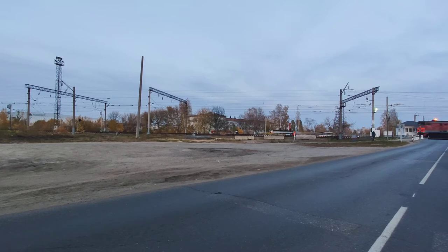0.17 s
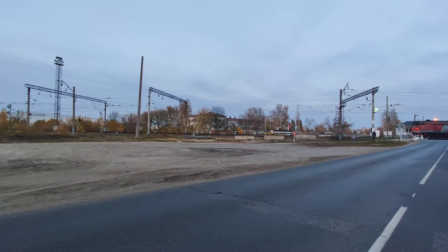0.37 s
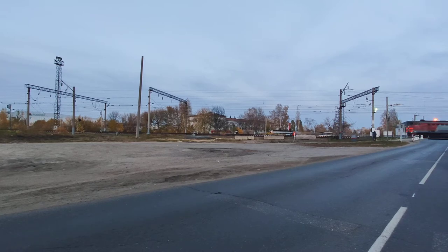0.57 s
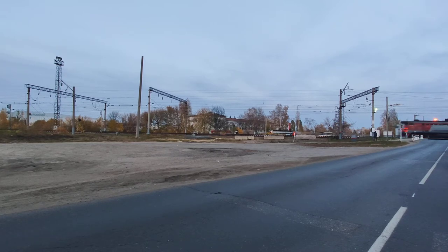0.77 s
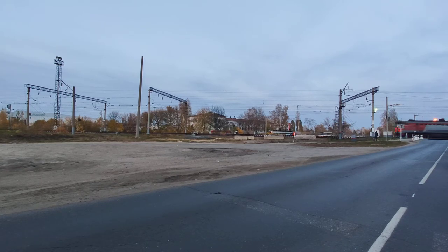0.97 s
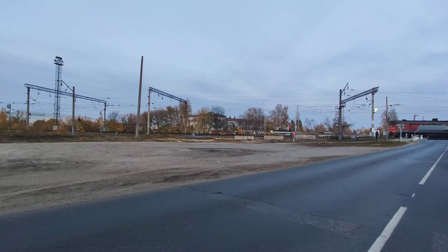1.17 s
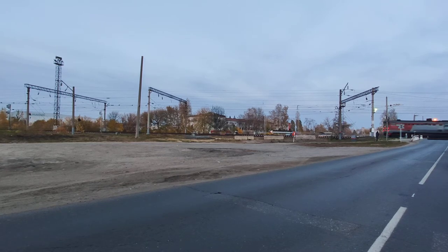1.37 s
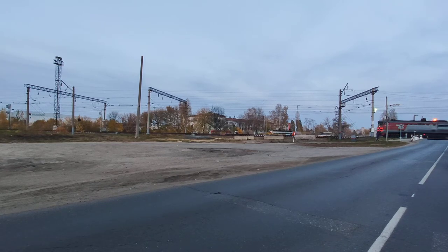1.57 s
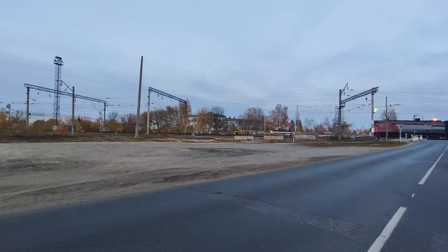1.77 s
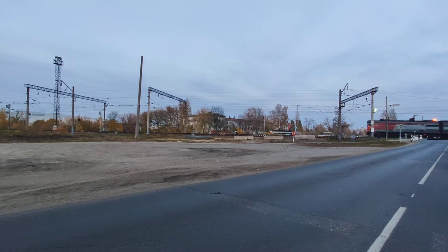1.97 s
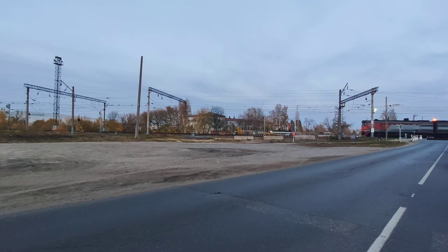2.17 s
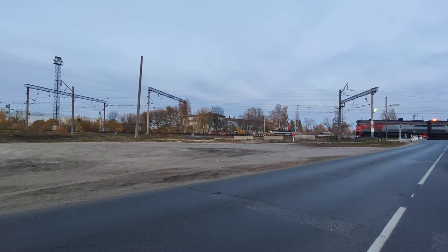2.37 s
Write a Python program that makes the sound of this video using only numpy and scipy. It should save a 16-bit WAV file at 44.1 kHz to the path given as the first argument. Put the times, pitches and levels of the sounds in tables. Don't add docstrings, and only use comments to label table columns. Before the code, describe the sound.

A distant diesel locomotive chugs unevenly at low revs with faint blower whine, while wheels rumble; a sharp clank and tick come early, then thuds and clanks thicken. Open roadside, stereo handheld microphone.

```python
import sys
import numpy as np
from scipy import signal
from scipy.fft import rfft, irfft
from scipy.io import wavfile

SR = 44100
rng = np.random.default_rng(int(sys.argv[2]) if len(sys.argv) > 2 else 0)


def magnitude_from_level(level_db):
    exponent = np.asarray(level_db, float) / 20
    return 10 ** exponent


def dump_mix(stems):
    frames = np.atleast_2d(stems).T
    limited = np.clip(frames, -1, 1)
    pcm = np.round(limited * 32767).astype(np.int16)
    wavfile.write(sys.argv[1], SR, pcm)


N = 111132
T = np.arange(N) / SR


def rms_one(x):
    return x / np.sqrt(np.mean(x ** 2) + 1e-20)


def at_hz(points, hz):
    table_hz, value = np.array(points).T[:2]
    return np.interp(np.log(hz), np.log(table_hz), value)


def drift(rate_hz):
    r = np.exp(-80 * np.pi * rate_hz / SR)
    slow = signal.lfilter([1], [1, -2 * r, r * r], rng.standard_normal(N // 40 + 2002))[2000:]
    return np.interp(np.arange(N) / 40, np.arange(len(slow)), rms_one(slow - slow.mean()))


def narrow(hz, width_hz, size=N):
    r = np.exp(-np.pi * width_hz / SR)
    poles = [1, -2 * r * np.cos(2 * np.pi * hz / SR), r * r]
    x = rng.standard_normal(size + 6000)
    for _ in range(2):
        x = signal.lfilter([1, 0, -1], poles, x)
    return rms_one(x[6000:])


def stereo_noise(colour_db, patchy_db, size=N):
    # f/Hz, likeness [0-1]
    likeness = [(40, .995), (300, .95), (600, .62), (900, .75), (1500, .55), (2200, .36), (3500, .4),
                (5000, .15)]
    # f/Hz, level/dB
    right_port = [(100, 1.2), (700, -0.5), (1300, -1), (2000, -1), (2900, 6.5), (3600, 10.5), (4400, -6.5),
                  (6500, -0.5)]
    hz = np.maximum(np.fft.rfftfreq(size, 1 / SR), 1)
    mid, side = rfft(rng.standard_normal((2, size)))
    alike = np.clip(at_hz(likeness, hz), 0, 1)
    pair = np.sqrt(1 + alike) * mid + np.sqrt(1 - alike) * side * [[1], [-1]]
    pair = pair * magnitude_from_level(colour_db(hz))
    pair = pair * magnitude_from_level(at_hz(right_port, hz) * [[-.5], [.5]])
    if not patchy_db:
        return rms_one(irfft(pair, size))
    place = 2 * np.log2(hz / 20)
    together = drift(3.3)
    out = np.zeros((2, size))
    for k in range(20):
        band = irfft(pair * np.clip(1 - abs(place - k), 0, 1), size)
        out += band * magnitude_from_level(patchy_db * (0.45 * together + drift(9.4)))
    return rms_one(out)


def table_colour(table):
    points = [(0.33, -34)] + list(table) + [(table[-1][0] * 1.82, -60), (SR, -60)]
    return lambda hz: at_hz(points, hz)


def swell(t, rise_s, hold_s, fall_s):
    return np.clip(t / rise_s, 0, 1) * np.exp(-np.maximum(t - rise_s - hold_s, 0) / fall_s)


def struck(t, hz, rough):
    mode = np.sqrt(2) * np.sin(2 * np.pi * (hz * t + rng.random()))
    return mode + rough * narrow(hz, hz / 6, size=len(t))


def add(out, start_s, x):
    i = int(start_s * SR)
    out[..., i:i + x.shape[-1]] += x[..., :N - i]


def exhaust():
    # t/ms, level/dB
    puffs = [(4, -50.5), (11.8, -38.4), (23.5, -48), (33.8, -54), (43.7, -45), (54.6, -44), (66.2, -46),
             (72.1, -47), (83.3, -52), (91.7, -34), (101.8, -38), (115.1, -36.5), (126.2, -38.5),
             (136, -38.3)]
    cycle_hz, puff_ms, spread_db = 6.757, 2.6, 1.0
    ms, db = np.transpose(puffs)
    at = ((np.arange(18)[:, None] / cycle_hz + ms / 1000) * SR).astype(int)
    train = np.zeros(N + SR)
    train[at] = magnitude_from_level(db + spread_db * rng.standard_normal(at.shape))
    u = np.arange(-600, 601) / SR * 1000 / puff_ms
    puff = (1 - u * u) * np.exp(-u * u / 2)
    return signal.fftconvolve(train, puff, "same")[:N]


def whines():
    pitches_hz = [925, 1637, 3356, 4210, 5320, 6755, 7597, 9354, 9669]
    # width/Hz, left level/dB, right level/dB, steady share [ratio], fade [dB/s]
    whine_rows = [(86, -55, -65, 0.12, -1), (62, -62.5, -55.5, 0, 1), (39.5, -55.5, -65, 1.5, 0),
                  (110, -65.5, -93, 0.2, 1.5), (300, -75, -70.5, 0, 0.5), (90, -63.5, -92, 0.39, -1.5),
                  (81, -89, -71, 0.21, -1.5), (90, -96, -80.5, 0.061, -2.5), (90, -94, -79, 1.1, -3.5)]
    out = np.zeros((2, N))
    for hz, (width_hz, left_db, right_db, steady, fade_db) in zip(pitches_hz, whine_rows):
        tone = np.sin(2 * np.pi * hz * T + 1.1 * drift(3.9)) * magnitude_from_level(1.5 * drift(7.0))
        level_db = np.array([[left_db], [right_db]]) + fade_db * T
        out += rms_one(narrow(hz, width_hz) + 2 * steady * tone) * magnitude_from_level(level_db)
    return out


def wheel_rumble():
    # t/s, level/dB
    roll = [(0.0, -48), (0.41, -48), (0.95, -48.5), (1.37, -46.5), (1.75, -44), (1.93, -45.5),
            (2.52, -43.5)]
    # f/Hz, density [dB per Hz]
    rumble_colour = [(25, -3), (50, -2), (130, -4.5), (210, -2.5), (310, -3), (420, -7), (700, -10.5),
                     (1200, -45)]
    roll_db = np.interp(T, *np.transpose(roll))
    return magnitude_from_level(roll_db + 2.5) * stereo_noise(table_colour(rumble_colour), patchy_db=1.5)


def joint_thuds():
    # t/s, level/dB, f/Hz
    thud_events = [(0.406, -53, 309), (.465, -48, 373), (0.577, -49.5, 258), (0.948, -50, 307),
                   (0.998, -52, 254.4), (1.125, -56, 329), (1.245, -37, 288), (1.32, -44, 217.6),
                   (1.355, -56, 307), (1.501, -41.5, 271), (1.539, -46, 255), (1.7, -40.5, 296),
                   (1.792, -39, 220.3), (1.8, -42.5, 296.4), (1.82, -41, 211), (1.825, -41, 300),
                   (1.91, -45, 396), (2.085, -40, 286.6), (2.132, -39.5, 299), (2.157, -41.5, 233),
                   (2.2, -55, 212), (2.25, -48, 352), (2.338, -42.5, 206), (2.393, -38.5, 273),
                   (2.42, -41, 198.7), (2.48, -48.5, 220)]
    out, t = np.zeros((2, N)), T[:12000]
    shape = swell(t, rise_s=0.0094, hold_s=0, fall_s=0.03)
    for start_s, db, hz in thud_events:
        add(out, start_s, magnitude_from_level(db) * struck(t, hz, rough=0.3) * shape)
    return out


def coupling_clanks():
    # t/s, level/dB, centre f/Hz, rise/s, fall/s
    clank_events = [
        (.375, -34, 660, 0.0018, 0.012),
        (.586, -39, 496, 0.0047, 0.0085),
        (.875, -42.5, 1020, 0.0055, 0.063),
        (1.129, -38, 900, 0.0038, 0.01),
        (1.545, -35, 740, 0.012, 0.018),
        (1.81, -38, 800, 0.014, 0.092),
        (1.886, -40, 670, 0.002, 0.021),
        (2.091, -33.5, 570, 0.0098, 0.023),
        (2.257, -34, 600, 0.003, 0.0034),
        (2.43, -57, 1010, .005, 0.022),
    ]
    low_db_oct, tilt_db_oct = 1, 8.5
    air_hz = 1690
    out, t = np.zeros((2, N)), T[:12000]
    for start_s, db, centre_hz, rise_s, fall_s in clank_events:
        def colour(hz):
            slope = np.where(hz > centre_hz, -tilt_db_oct, low_db_oct)
            return slope * np.log2(hz / centre_hz) - (hz / air_hz) ** 2
        shape = swell(t, rise_s, 0, fall_s)
        burst = rms_one(stereo_noise(colour, 0, size=len(t)) * shape)
        add(out, start_s, magnitude_from_level(db) * np.sqrt(np.mean(shape ** 2)) * burst)
    return out


def steel_rings():
    # t/s, f/Hz, level/dB, hold/s
    ring_events = [
        (0.873, 925, -44, 0.018),
        (0.935, 893, -52, 0.032),
        (1.479, 1646, -46, 0.061),
        (1.609, 1637, -57, 0.07),
        (1.767, 906, -45, 0.019),
        (1.828, 920, -52, 0.048),
        (1.996, 1637, -51, 0.041),
        (2.122, 918, -43, 0.022),
        (1.813, 3330, -50.5, 0.026),
        (2.088, 3350, -52, .01),
    ]
    out, t = np.zeros((2, N)), T[:12000]
    for start_s, hz, db, hold_s in ring_events:
        shape = swell(t, 0.0023, hold_s, fall_s=0.036)
        add(out, start_s, magnitude_from_level(db) * struck(t, hz, rough=0.45) * shape)
    return out


def flange_rasps():
    # t/s, level/dB, hold/s
    rasp_events = [
        (0.365, -63, .005),
        (0.864, -55.5, .035),
        (1.12, -69, .02),
        (1.396, -61.5, 1.1),
        (1.497, -66, .1),
        (1.79, -54, 0.08),
        (2.08, -60, 0.066),
        (2.41, -55.5, 0.04),
    ]
    # f/Hz, density [dB per Hz]
    rasp_colour = [(1800, -30), (3200, 0.5), (4200, -10), (5300, -16), (6400, -13.5), (7300, -34),
                   (8200, -22), (9000, -47)]
    effort = np.zeros(N)
    for start_s, db, hold_s in rasp_events:
        effort += magnitude_from_level(db) * swell(T - start_s, rise_s=0.012, hold_s=hold_s, fall_s=0.045)
    return effort * stereo_noise(table_colour(rasp_colour), patchy_db=-1.5)


def tick():
    port_db = (-26, -29)
    start_s, hz, rise_s, fall_s = 0.3765, 900, 0.0003, 0.0016
    t = T - start_s
    snap = -np.cos(2 * np.pi * hz * (t - rise_s)) * swell(t, rise_s, 0, fall_s)
    return magnitude_from_level(np.array(port_db)[:, None]) * snap


def engine_roar(near_db):
    # f/Hz, density [dB per Hz]
    roar_colour = [(200, -25), (450, -5), (900, 0), (1300, -4.5), (2300, -9.5), (2850, -6), (4000, -20),
                   (6300, -26.5)]
    return magnitude_from_level(-45 + 0.78 * near_db) * stereo_noise(table_colour(roar_colour), patchy_db=0.5)


def air_hiss():
    # f/Hz, density [dB per Hz]
    hiss_colour = [(3000, -27.5), (6000, -9.5), (6900, -15), (7300, -30), (8700, -33), (9100, -19),
                   (11000, -25.5), (16500, -22.5)]
    return magnitude_from_level(-74) * stereo_noise(table_colour(hiss_colour), patchy_db=-0.5)


def scene():
    # t/s, level/dB
    near = [(0, -1), (.8, 0.3), (1.6, 0.06), (2.52, 1.5)]
    right_lag_s = 0.3646e-3
    near_db = np.interp(T, *np.transpose(near))
    engine = magnitude_from_level(near_db) * exhaust() + whines() + engine_roar(near_db)
    wagons = wheel_rumble() + joint_thuds() + coupling_clanks() + steel_rings() + flange_rasps()
    left, right = engine + wagons + tick() + air_hiss()
    turn = np.exp(-2j * np.pi * np.fft.rfftfreq(N, 1 / SR) * right_lag_s)
    return np.array([left, irfft(rfft(right) * turn, N)])


def top_cut(x):
    return signal.sosfilt(signal.butter(12, 15720, fs=SR, output="sos"), x)


def record(dry):
    return top_cut(dry)


dry = scene()
out = record(dry)
dump_mix(out)
```